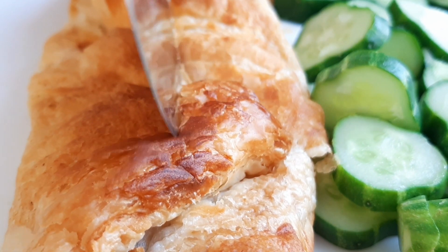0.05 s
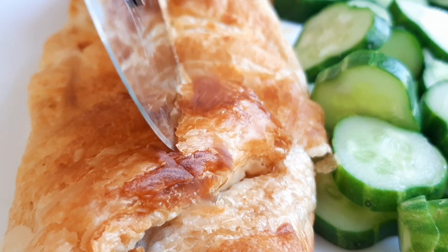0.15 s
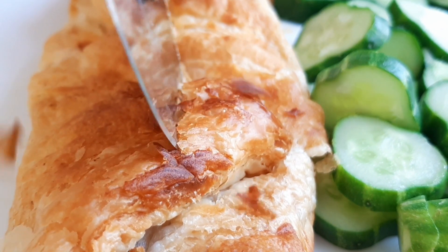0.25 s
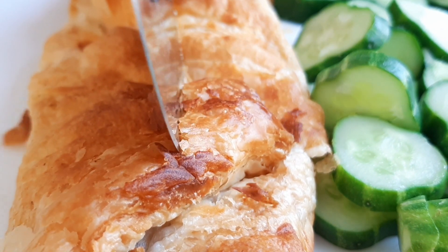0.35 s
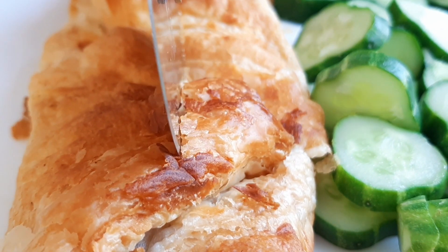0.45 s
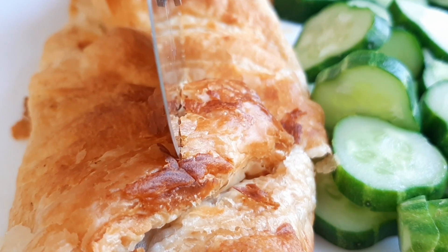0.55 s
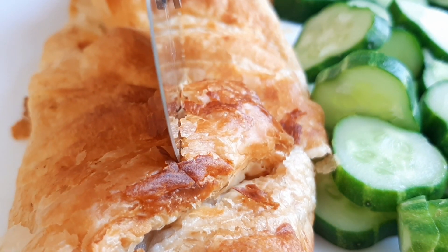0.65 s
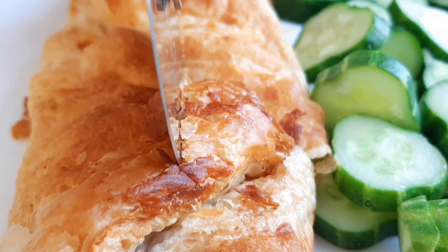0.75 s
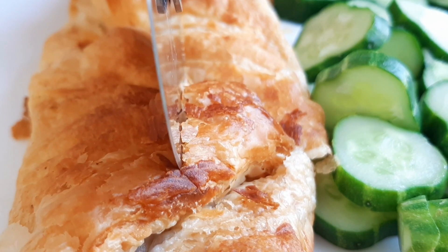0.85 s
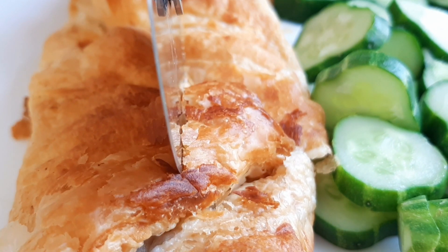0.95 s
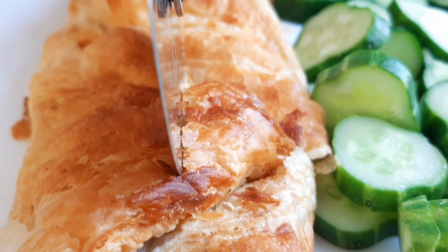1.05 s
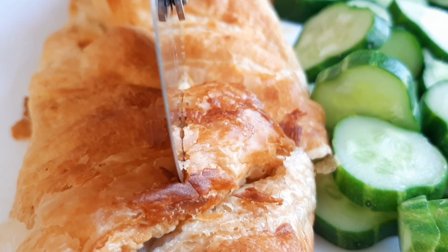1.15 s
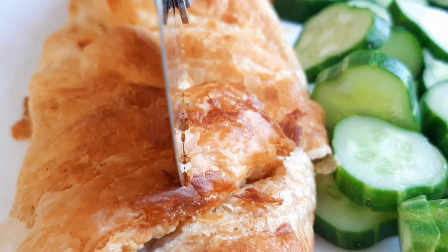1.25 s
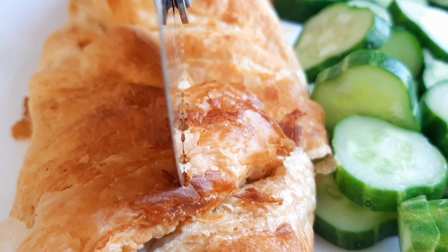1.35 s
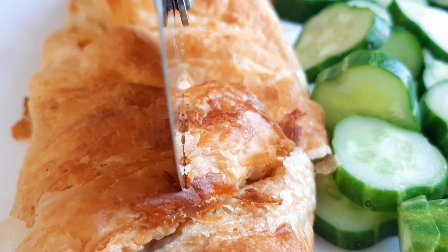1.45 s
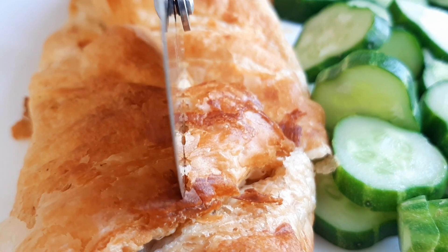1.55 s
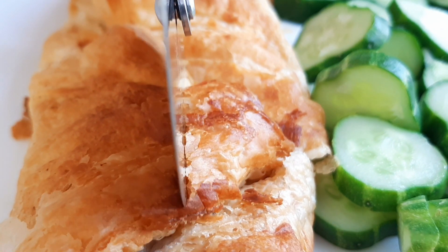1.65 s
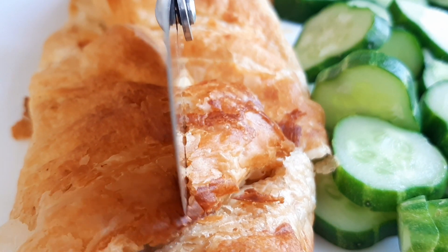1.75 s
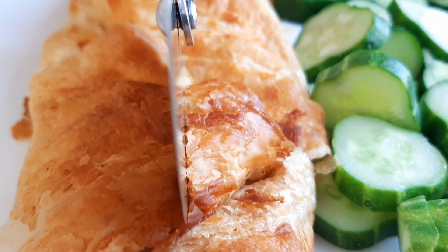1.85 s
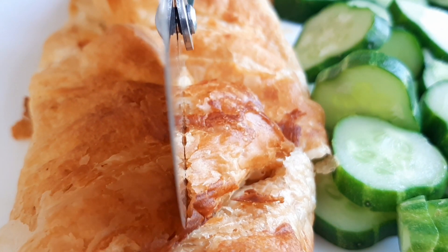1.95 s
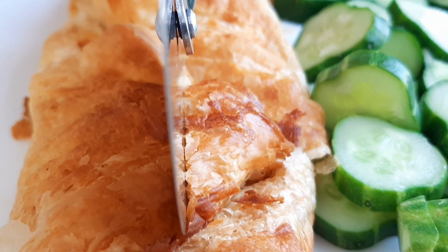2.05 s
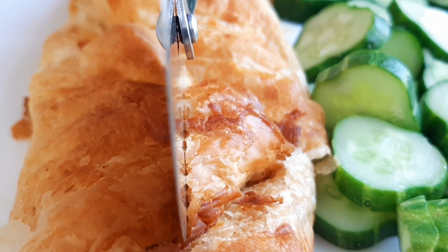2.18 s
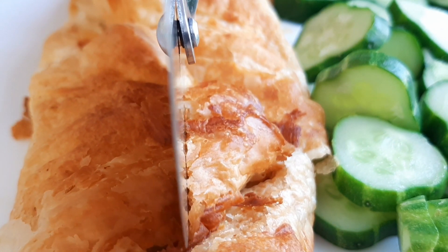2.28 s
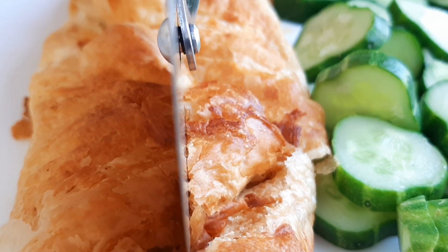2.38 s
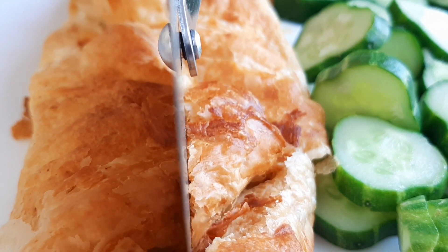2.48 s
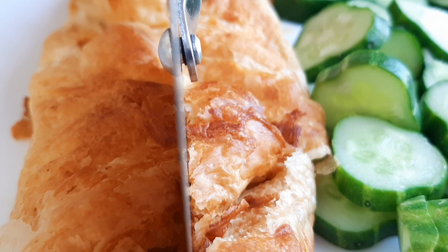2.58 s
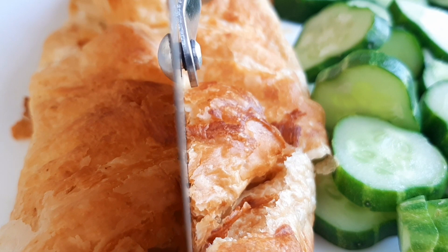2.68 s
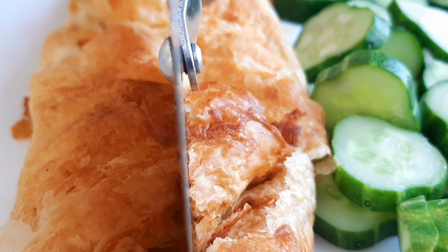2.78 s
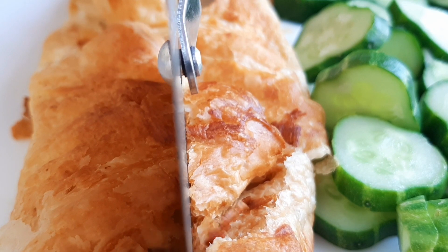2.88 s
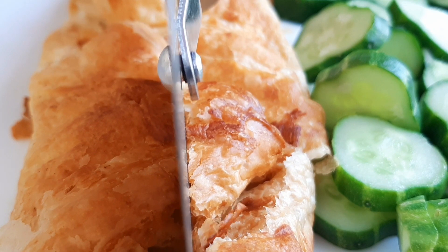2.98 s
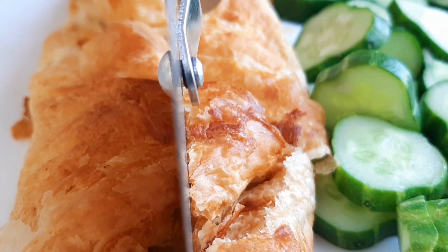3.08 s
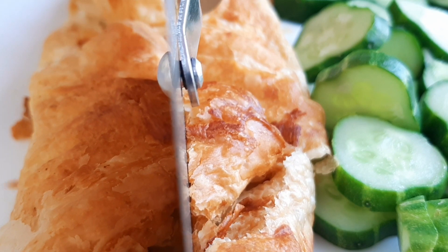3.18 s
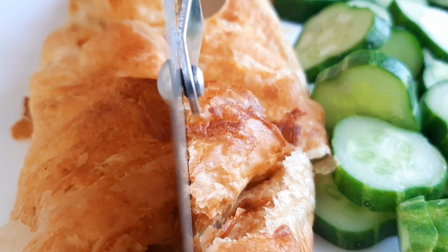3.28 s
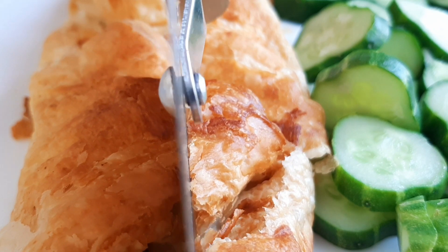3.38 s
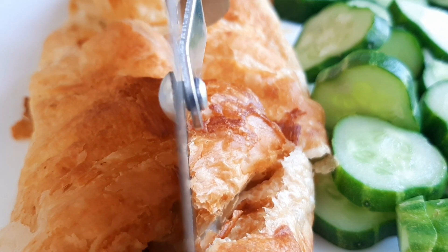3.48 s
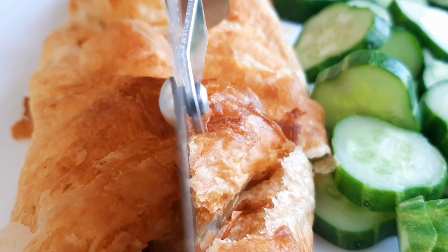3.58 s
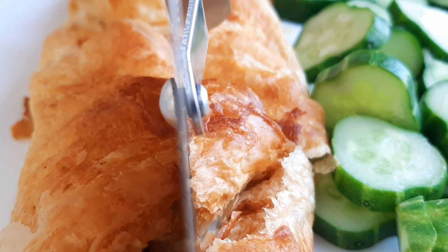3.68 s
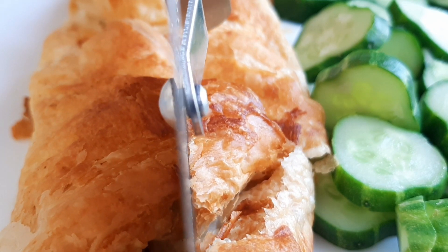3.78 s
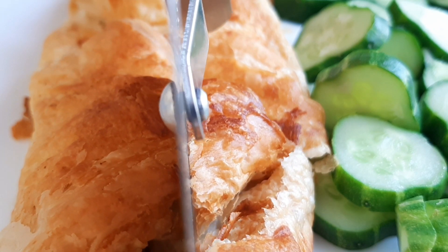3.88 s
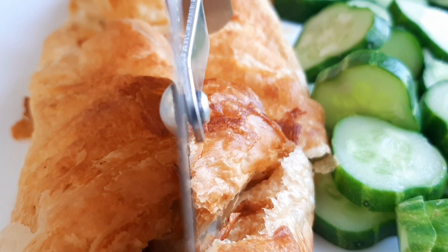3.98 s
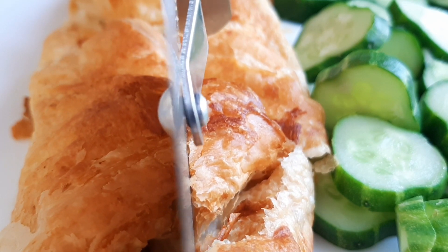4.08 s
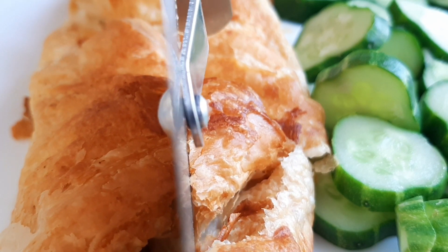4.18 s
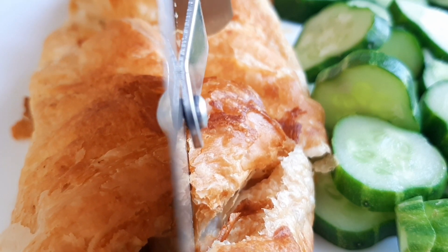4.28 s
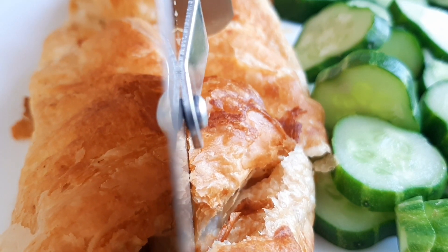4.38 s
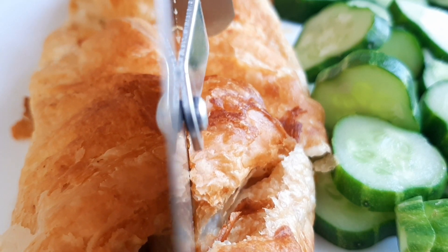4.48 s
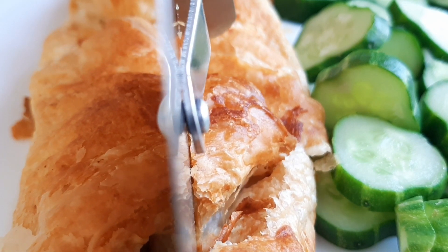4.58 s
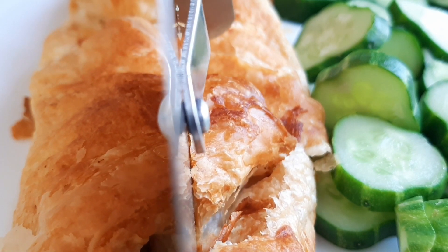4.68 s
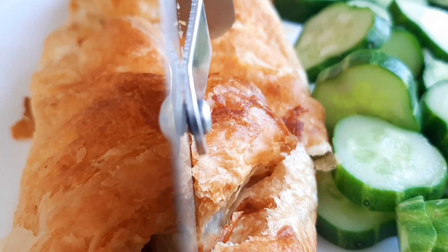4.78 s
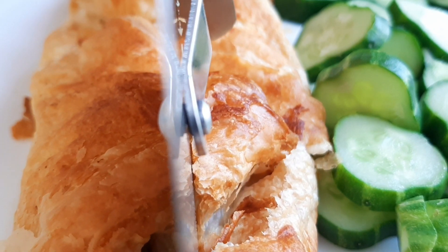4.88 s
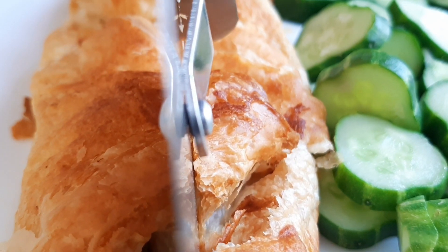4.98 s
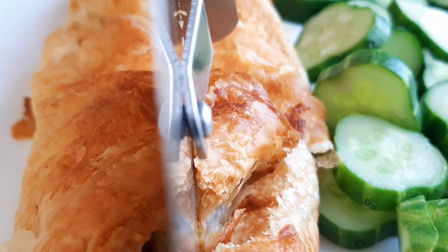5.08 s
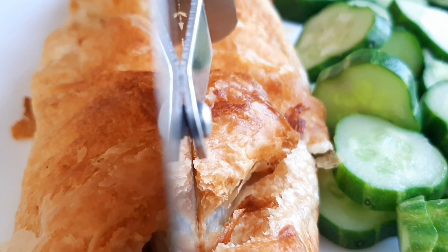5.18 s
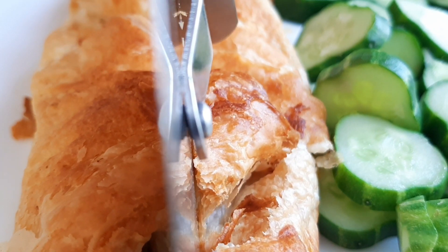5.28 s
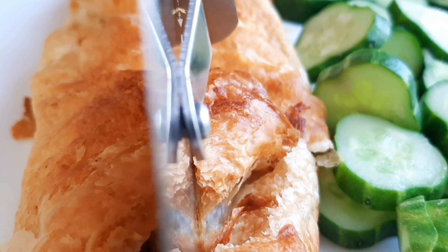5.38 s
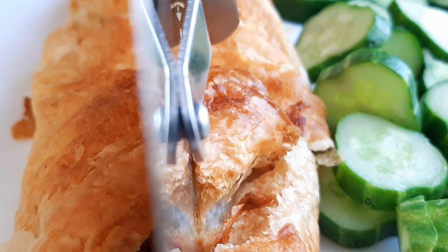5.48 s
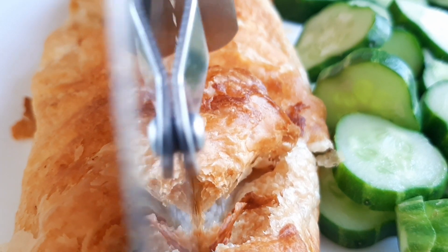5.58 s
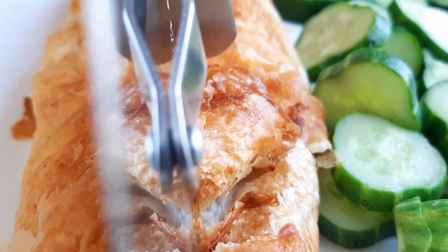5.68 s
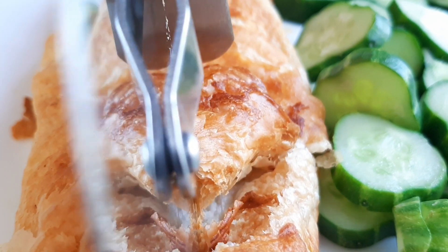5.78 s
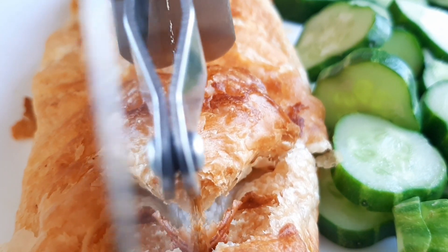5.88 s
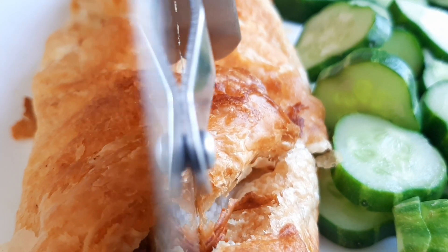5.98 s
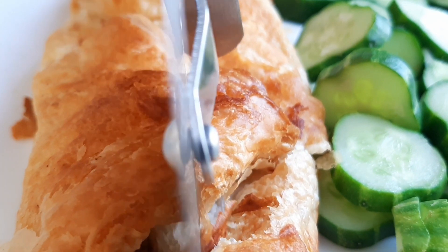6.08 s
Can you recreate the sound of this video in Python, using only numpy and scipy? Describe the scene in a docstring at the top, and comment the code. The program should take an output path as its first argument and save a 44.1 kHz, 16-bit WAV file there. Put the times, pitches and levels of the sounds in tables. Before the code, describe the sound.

Dry, brittle pastry crust crackles under slow scissor blades over soft dull dough rustle, ending in sharp snaps and a crunch with a plate knock.

```python
"""Scissors through a flaky pastry roll

Kitchen scissors close in short pushes through the roll on a plate, close to the microphone in a quiet room.
The crust crackles and snaps in bursts of noise over a dull rustle of soft dough and a few low bumps.
Late in the cut three hard breaks ring the damped modes of the plate, the last with a loud crunch.
Nearly all of it is in the left channel, with room noise and a faint hum; the right holds only a faint hiss."""
import sys
import numpy as np
from scipy import signal
from scipy.fft import rfft, irfft
from scipy.io import wavfile
from scipy.ndimage import uniform_filter1d

SR = 44100
rng = np.random.default_rng(int(sys.argv[2]) if len(sys.argv) > 2 else 0)


def store_pcm(level_fs):
    """Save levels as 16-bit WAV."""
    pcm = np.round(np.clip(level_fs, -1, 1) * 32767).astype(np.int16)
    wavfile.write(sys.argv[1], SR, np.atleast_2d(pcm).T)


N = 270774
TIME = np.arange(N) / SR

# The hand closes the blades in short pushes. Each row: start in seconds, length in seconds,
# relative crust level in dB, relative dough level in dB.
PUSHES = [(0.003, 0.13, -33, -51.5), (0.207, .04, -65, -56), (0.351, 0.235, -48.5, -57.5),
          (0.617, 0.084, -46, -56), (0.76, 0.205, -46, -54), (1.013, 0.17, -52.5, -58.5),
          (1.132, 0.13, -43, -53), (1.413, 0.13, -53, -54), (1.5, 0.081, -44, -49.5),
          (1.616, 0.092, -43.5, -44), (1.754, 0.13, -51, -50), (1.975, 0.16, -54, -55),
          (2.213, 0.282, -46.5, -55), (2.542, 0.14, -49, -55), (2.717, 0.26, -51.5, -55),
          (2.958, 0.13, -44.5, -54), (3.201, 0.15, -45, -48), (3.289, .11, -40.5, -52),
          (3.441, 0.15, -43, -49.5), (3.811, 0.12, -44, -52.5), (4.025, 0.031, -45.5, -52),
          (4.122, 0.052, -49, -52), (4.279, 0.0079, -47, -54.5), (4.495, 0.02, -52.5, -49),
          (4.791, 0.027, -60, -69), (4.889, 0.136, -53.5, -57), (5.084, 0.025, -50, -52),
          (5.372, .12, -60.5, -70), (5.554, .085, -33.5, -45.5), (5.67, 0.065, -37.5, -45),
          (5.977, 0.23, -52.5, -61)]
# Narrow resonances of the microphone ports. Each row: frequency in Hz, width in Hz, gain in dB.
PORT_PEAKS = [(1494, 48, 6.5), (2090, 34, 5.5)]

BODY_HZ, MIDDLE_HZ, TREBLE_HZ = 363, 2390, 7760   # lower edges of the three registers of a crack
CUTOFF_HZ = 16100
LEAD_S = 0.00126   # the burst of a crack begins to grow this long before its given time
CRUST_RISE_S, CRUST_FALL_S = 0.019, 0.019   # time constants of the crumbling before and after a push
SETTLE_DB, SETTLE_S = -14.5, 0.13   # after a push the crust goes on settling, this much weaker, and dies away
DOUGH_RISE_S, DOUGH_FALL_S = 0.021, 0.08   # the dough is slower to yield and to recover
CRUST_REST_DB, DOUGH_REST_DB = -77, -60.5   # relative levels under the mere weight of the blades
# The layers give way unevenly, so the crumbs come in clumps: spread of level, fastest rate.
CLUMP_DB, CLUMP_HZ = 2.5, 50.2
STRAY_DB, STRAY_FOLLOWS = -55, 0.72   # stray thin flakes: mean level, share of the swing of the crumbling
ROOM_T60_S, ROOM_DB = 0.24, -16.5
HUM_HZ, HUM_DB = 96.1, -61.5   # level is rms


def from_db(db):
    """Decibels to gain."""
    return 10 ** (np.asarray(db) / 20)


def rms_one(x):
    """Scale to rms 1."""
    return x / np.sqrt(np.mean(x ** 2) + 1e-20)


def unit_energy(x):
    """Scale each row to energy 1."""
    return x / np.sqrt(np.sum(x ** 2, axis=-1, keepdims=True) + 1e-20)


def in_time(rows):
    """Columns of a curve table at every sample."""
    s, *columns = np.transpose(rows)
    return [np.interp(TIME, s, column) for column in columns]


def add(out, s, sound):
    """Mix a short sound in at time s."""
    start = int(np.clip(s * SR, 0, N - 1))
    out[start:start + len(sound)] += sound[:N - start]


def band(x, low_hz, high_hz):
    """Causal band-pass."""
    edges = [low_hz, min(high_hz, 0.45 * SR)]
    return signal.sosfilt(signal.butter(3, edges, "band", fs=SR, output="sos"), x)


def noise(spectrum):
    """Steady noise with the given dB per Hz."""
    hz, db = np.transpose(spectrum)
    bins = np.maximum(np.fft.rfftfreq(N, 1 / SR), 1)
    gain = from_db(np.interp(np.log(bins), np.log(hz), db))
    return irfft(rfft(rng.standard_normal(N)) * gain, N) * np.sqrt(SR / 2)


def resonate(x, peaks):
    """A chain of resonant peaks and dips."""
    for hz, width, db in peaks:
        b, a = signal.iirpeak(hz, hz / width, fs=SR)
        x = x + (from_db(db) - 1) * signal.lfilter(b, a, x + 1e-18)
    return x


def fractures(count, rise_s, decay_s, spread, tail_db, tail_s):
    """Cracks run through flakes: tiny slips swell into a very short burst, then a weak after-rustle."""
    t = np.arange(SR // 50) / SR - 0.0015   # the burst peaks 1.5 ms in
    length = decay_s * np.exp(spread * rng.uniform(-1, 1, (count, 1)))
    growth = np.exp(np.minimum(t, 0) / rise_s)
    after = np.maximum(t, 0)
    rustle = from_db(tail_db) * np.exp(-after / tail_s)
    shape = growth * (np.exp(-after / length) + rustle)
    return shape * rng.standard_normal((count, len(t)))


def registers(cracks):
    """Body, middle and treble of each crack, each of energy 1."""
    edges = [BODY_HZ, MIDDLE_HZ, TREBLE_HZ, CUTOFF_HZ]
    return [unit_energy(band(cracks, low, high)) for low, high in zip(edges, edges[1:])]


def snaps(gain_db, body_db, treble_db, ring_db, ring_width):
    """Large flakes break one by one, each a noise burst with a short ring of its own."""
    # The largest flakes breaking. Each row: time in seconds, relative level of the middle register in dB,
    # body relative to it in dB, treble relative to it in dB, ring of the flake in Hz.
    large_flakes = [(0.0097, -40.5, -17, 9, 7900), (0.078, -21.5, -8.5, -2, 2760),
                    (0.0947, -22.5, -5, -0.5, 2650), (0.2077, -30.5, -3, -23, 3970),
                    (0.3353, -32, -8, -4, 3420), (0.4445, -41.5, 1, 6, 3340), (0.4831, -58, -9, -10, 4230),
                    (0.4949, -29, -6.5, 0, 2800), (0.5517, -38, -10, 6, 7700),
                    (0.634, -30.5, -6.5, 10.5, 7200), (0.6624, -37.5, 2, 11.5, 2150),
                    (0.6994, -37.5, -2, 5, 4970), (0.8034, -21.5, -14.5, -5, 4900),
                    (0.8177, -35.5, -4, 10.5, 4780), (0.8917, -22, -12, -0.5, 4730),
                    (0.9407, -28, -16, 6.5, 3200), (0.9497, -26.5, -6, -9, 4090),
                    (0.9687, -24, -8.5, 2, 3070), (1.014, -29, -3.5, -3.5, 3570),
                    (1.0844, -19, -11, 1, 3680), (1.1377, -24.5, -6, 1.5, 3860),
                    (1.1605, -30.5, -10, 5, 4700), (1.2001, -34, -13, 9.5, 5860),
                    (1.2548, -31.5, -17, -26, 5600), (1.4582, -35.5, -7.5, 2, 7060),
                    (1.4877, -35, 0.5, 1, 6100), (1.5239, -30.5, -18, 1, 5120),
                    (1.5521, -40.5, -2, 8, 5940), (1.6953, -44, -10, 13, 5000),
                    (1.7076, -31.5, -1.5, 6, 3530), (1.8176, -33.5, -26, -6, 6140),
                    (1.859, -33, -7, -3, 4100), (1.9224, -36, -7, 1, 4570), (2.0056, -29.5, -15, -10, 4200),
                    (2.0486, -42.5, 5, 10.5, 800), (2.1267, -35.5, -1, -2.5, 6200),
                    (2.2708, -25, -15, -11, 3100), (2.407, -34.5, 2.5, 2.5, 3140),
                    (2.4351, -34.5, -2.5, -4, 3370), (2.4805, -26.5, -5, -2, 3120),
                    (2.5158, -29, -3, -8, 800), (2.5741, -31, -6, -10, 6890), (2.6311, -29.5, -2, 5, 3500),
                    (2.6478, -24, -5, -11, 3400), (2.8333, -23, -18.5, -15, 6050),
                    (2.888, -30.5, -8.5, -5.5, 4800), (2.9939, -24.5, -6, -13, 3920),
                    (3.0841, -30.5, -12, -12, 5840), (3.2041, -27.5, -10, -1, 3260),
                    (3.3077, -28, -5, -13, 2970), (3.3502, -28, -27, -4, 3470),
                    (3.3785, -25.5, -31, -8, 5160), (3.4373, -34.5, -3.5, 7, 7210),
                    (3.5466, -32.5, -7, 9.5, 7350), (3.7988, -38.5, -2, 7, 1660),
                    (3.8352, -32, -9, 0, 5300), (3.8825, -33, 0.5, 6.5, 4290),
                    (3.9607, -40.5, -4, 11, 5700), (4.0141, -29, -9.5, 3.5, 4120),
                    (4.1246, -32.5, -11, -10, 3270), (4.1844, -28.5, -15, 1.5, 5700),
                    (4.2031, -31, -9, 0, 2950), (4.2681, -32.5, -13.5, -2, 5800),
                    (4.4803, -18.5, -12, 0, 7260), (4.4929, -30, -3.5, 1, 3380),
                    (5.0231, -30, -35, -7, 4160), (5.0429, -18, -8, 1.5, 5140), (5.086, -41, -10, 11, 7200),
                    (5.3848, -42.5, -19, 3, 7200), (5.5264, -17, -20, -7, 6680),
                    (5.5306, -22, -12, 7.5, 5900), (5.5346, -20.5, -17, 9.5, 4270),
                    (5.5385, -15, -8.5, 3.5, 7250), (5.5701, -20, -6.5, -1, 4820),
                    (5.5847, -35.5, -2.5, 22.5, 7350), (5.5938, -24, -30, 5, 6000),
                    (5.6149, -18, -11.5, 8, 5700), (5.6614, -22.5, -6, 8.5, 4400),
                    (5.7094, -30, -12, 5, 4400), (5.733, -44, -8, 19, 4440),
                    (5.7544, -27.5, -12, 7.5, 3440), (5.8129, -35.5, -11, -21, 3960),
                    (6.0734, -33.5, -6, -1.5, 4570)]
    # bigger breaks run longer
    level_db = np.array(large_flakes)[:, 1:2]
    decay_s = 0.0006 * from_db(0.15 * (level_db + 33))
    cracks = fractures(len(large_flakes), rise_s=0.00033, decay_s=decay_s, spread=0.25,
                       tail_db=-14, tail_s=0.002)
    cracks = np.array([resonate(crack, [(hz, hz * ring_width, ring_db)])
                       for crack, (*_, hz) in zip(cracks, large_flakes)])
    out = np.zeros(N)
    for (s, db, thick_db, thin_db, _), body, middle, treble in zip(large_flakes, *registers(cracks)):
        # thick flakes have more body, thin ones more treble
        flake = from_db(thick_db + body_db) * body + middle + from_db(thin_db + treble_db) * treble
        add(out, s - LEAD_S, from_db(db) * flake)
    # the factor turns energy into rms over a millisecond
    return out * from_db(gain_db) * np.sqrt(SR / 1000)


def push(start_s, length_s, rise_s, fall_s):
    """Envelope of one push: it swells, holds and dies away."""
    before = np.minimum(TIME - start_s, 0)
    after = np.maximum(TIME - start_s - length_s, 0)
    return np.exp(before / rise_s - after / fall_s)


def crust_level():
    """Level of the crumbling in dB: it follows each push, then the crust settles."""
    gain = from_db(CRUST_REST_DB)
    for s, length, db, _ in PUSHES:
        pressing = push(s, length, CRUST_RISE_S, CRUST_FALL_S)
        settling = from_db(SETTLE_DB) * push(s, length, CRUST_RISE_S, SETTLE_S)
        gain = np.maximum(gain, from_db(db) * np.maximum(pressing, settling))
    return 20 * np.log10(gain)


def crumbling(level_db, per_s, busier, size_db, length_s, body_db, treble_db, colour_db, ring_db,
              deeper, count=32):
    """Small cracks of unequal size and colour at random moments; the harder the press, the denser they come."""
    # Treble of the crumbs over time. Each row: time in seconds, relative treble level in dB.
    treble_curve = [(0, -5.5), (0.8, -3), (1.55, -5), (2.2, -6.5), (3.3, -4), (4.2, -5), (5.55, -3),
                    (5.85, -11.5)]
    bright_db, = in_time(treble_curve)
    swing_db = level_db - np.mean(level_db)
    rate = per_s * from_db(busier * swing_db)
    sizes = from_db(size_db * np.minimum(rng.exponential(1, N), 3.6))
    clicks = (rng.random(N) < rate / SR) * sizes
    # the work of the blades is shared among the cracks of each moment
    clicks /= np.sqrt(uniform_filter1d(clicks ** 2, size=1700) + rate / SR / 2)
    # a family of crumbs, from thick and low to thin and high
    cracks = fractures(count, rise_s=0.65 * length_s, decay_s=length_s, spread=0.5,
                       tail_db=-20, tail_s=0.0022)
    pitches = np.geomspace(2700, 15000, count)
    cracks = np.array([resonate(crack, [(hz, hz / 6, ring_db)]) for crack, hz in zip(cracks, pitches)])
    body, middle, treble = registers(cracks)
    thinness = rms_one(from_db(colour_db * np.linspace(-1, 1, count)))[:, None]
    thickness = thinness[::-1]
    body, middle, treble = body * thickness, middle * thickness, treble * thinness
    # hard pressing crushes thicker layers, which have more body
    thick_db = body_db + deeper * swing_db
    out = np.zeros(N)
    moments = np.flatnonzero(clicks)
    kinds = rng.integers(0, count, len(moments))
    for i, k in zip(moments, kinds):
        crumb = from_db(thick_db[i]) * body[k] + middle[k] + from_db(bright_db[i] + treble_db) * treble[k]
        add(out, i / SR - LEAD_S, clicks[i] * crumb)
    return from_db(level_db) * out


def crust(level_db, swing_db):
    """Large flakes, stray flakes and fine crumbs sound through the broad resonances of the crust."""
    # Resonances the crackle sounds through: broad ones of the cracking crust, and a narrow one of the
    # microphone ports near 1.5 kHz. Each row: frequency in Hz, width in Hz, gain in dB.
    crust_peaks = [(775, 320, 3), (1513, 55, 7), (2390, 1970, -3.5), (3100, 1980, 2.5), (8780, 3600, -5.5),
                   (11570, 4170, 5)]
    clumps_db = CLUMP_DB * rms_one(band(rng.standard_normal(N), CLUMP_HZ / 4, CLUMP_HZ))
    large = snaps(gain_db=0.1, body_db=-1.0, treble_db=-2.0, ring_db=10, ring_width=0.16)
    # thin flakes tick short and bright
    stray = crumbling(STRAY_DB + STRAY_FOLLOWS * swing_db, per_s=28, busier=0.25, size_db=5.5,
                      length_s=0.00013, body_db=-10.5, treble_db=6.5, colour_db=2, ring_db=7.5, deeper=0.35)
    fine = crumbling(level_db + clumps_db, per_s=700, busier=0.45, size_db=3,
                     length_s=0.00074, body_db=-12.5, treble_db=1.4, colour_db=4.5, ring_db=5.0, deeper=0.11)
    return resonate(large + stray + from_db(-1.84) * fine, crust_peaks)


def dough(gain_db, lumpy_db):
    """Under each push the soft layers give way in small lurches, a dull rustle."""
    # Colour of the rustle. Each row: frequency in Hz, relative density in dB per Hz.
    dough_colour = [(60, -8), (125, -3), (185, 2.5), (240, 5), (400, -1.5), (600, -5.5), (1000, -11),
                    (1600, -13.5), (3000, -23.5)]
    squeeze = from_db(DOUGH_REST_DB)
    for s, length, _, db in PUSHES:
        squeeze = np.maximum(squeeze, from_db(db) * push(s, length, DOUGH_RISE_S, DOUGH_FALL_S))
    lurch = rms_one(band(rng.standard_normal(N), 14.2, 69))
    rustle = rms_one(noise(dough_colour) * from_db(lumpy_db * lurch))
    return from_db(gain_db) * squeeze * rustle


def plate():
    """Each knock rings the damped modes of the plate; the lowest outlasts the rest, so the thud sinks in pitch."""
    # The blades jolt through and knock the plate. Each row: time in seconds, relative level in dB,
    # extra depth in dB per octave (lifts the modes below the median one, weakens those above).
    knocks = [(1.0862, -49, 0), (4.4808, -36.5, 4), (5.043, -36.5, 7.5), (5.5304, -28, 3), (5.5401, -42, 1),
              (5.661, -47.5, -2.5)]
    # Modes of the plate loaded with food. Each row: frequency in Hz, relative level in dB, T60 in seconds.
    modes = [(138.7, -17.5, 0.23), (198, -12, 0.065), (257.5, -13.5, 0.18), (384, -1.5, 0.081),
             (486, -1, 0.074), (863, -3.5, 0.058), (1090, 1, 0.027), (1990, 1, 0.089)]
    t = np.arange(SR // 2) / SR
    out = np.zeros(N)
    middle_hz = np.median(np.array(modes)[:, 0])
    for s, db, depth_db in knocks:
        for hz, mode_db, t60 in modes:
            depth = depth_db * np.log2(middle_hz / hz)
            strength = from_db(db + mode_db + depth) * rng.choice([-1, 1])
            add(out, s, strength * np.sin(2 * np.pi * hz * t) * np.exp(-np.log(1000) * t / t60))
    return out


def bumps():
    """Short, full swells of low rumble through the table."""
    # Dull bumps as the roll shifts under the hand. Each row: centre in seconds, level in dB,
    # half length (standard deviation of the swell) in seconds.
    shifts = [(0.15, -49.5, 0.028), (1.668, -37.5, 0.026), (3, -54, 0.13), (3.895, -50, 0.059),
              (5.59, -62, 0.044)]
    # Colour of the rumble. Each row: frequency in Hz, relative density in dB per Hz.
    rumble_colour = [(25, -49), (45, -8), (62, -6), (85, -4.5), (130, -36), (190, -10.5), (260, -20),
                     (900, -56)]
    swell = sum(from_db(db) * np.exp(-0.5 * ((TIME - s) / half) ** 2) for s, db, half in shifts)
    rumble = noise(rumble_colour)
    # evened out, so that each swell is full
    return swell * rumble / np.sqrt(uniform_filter1d(rumble ** 2, size=1800))


def kitchen(x, first_wall_s):
    """A weak diffuse tail that builds up until the nearest wall answers, then decays."""
    t = np.arange(SR // 2) / SR
    decay = np.exp(-np.log(1000) * t / ROOM_T60_S)
    onset = np.clip(t / first_wall_s, 0, 1) ** 2
    tail = rng.standard_normal(len(t)) * decay * onset
    return from_db(ROOM_DB) * signal.oaconvolve(x, unit_energy(tail))[:N]


def room_noise():
    """Steady noise of the quiet room, coloured by the microphone ports."""
    # Room noise ahead of the ports. Each row: frequency in Hz, density in dB per Hz.
    room_colour = [(20, -104), (42, -93.5), (64, -72.5), (95, -78.5), (130, -84.5), (300, -93.5),
                   (800, -94), (1300, -101), (1700, -102), (2500, -110), (5000, -115), (8500, -127),
                   (13000, -115), (16000, -117)]
    return resonate(noise(room_colour), PORT_PEAKS)


def appliance_hum():
    """A faint appliance hum, one steady sine."""
    return from_db(HUM_DB) * np.sqrt(2) * np.sin(2 * np.pi * HUM_HZ * TIME)


def right_hiss(swing_db):
    """Faint port-coloured hiss on the right, swelling a little while the crust crumbles."""
    # Hiss ahead of the ports and the swell. Each row: frequency in Hz, density in dB per Hz.
    hiss_colour = [(20, -119), (40, -104), (65, -97), (200, -101.5), (1000, -108.5), (2500, -113),
                   (5000, -117), (8500, -133), (13500, -115), (16000, -118)]
    return resonate(noise(hiss_colour), PORT_PEAKS) * from_db(0.095 * swing_db)


def scene():
    """The cut with its room tail, room noise and hum on the left; only hiss on the right."""
    level_db = crust_level()
    swing_db = level_db - np.mean(level_db)
    cut = crust(level_db, swing_db) + dough(gain_db=-0.5, lumpy_db=2.5) + plate() + bumps()
    left = cut + kitchen(cut, first_wall_s=0.001) + room_noise() + appliance_hum()
    return np.array([left, right_hiss(swing_db)])


def record(dry):
    """The top is cut steeply by an elliptic low-pass."""
    return signal.sosfilt(signal.ellip(10, 0.2, 75, CUTOFF_HZ, fs=SR, output="sos"), dry)


dry = scene()
out = record(dry)
store_pcm(out)
```